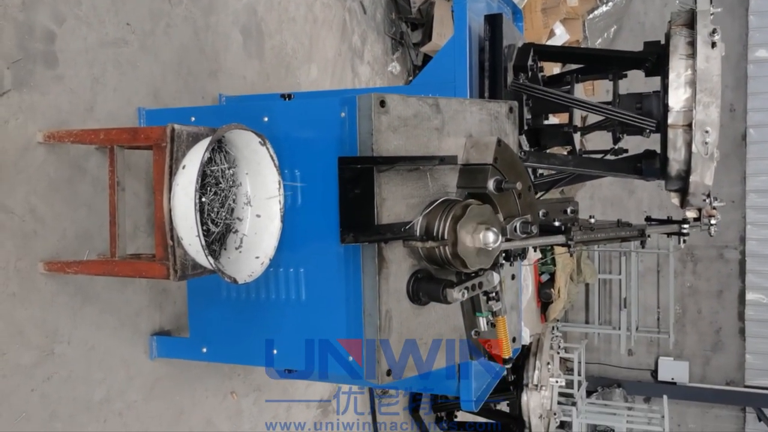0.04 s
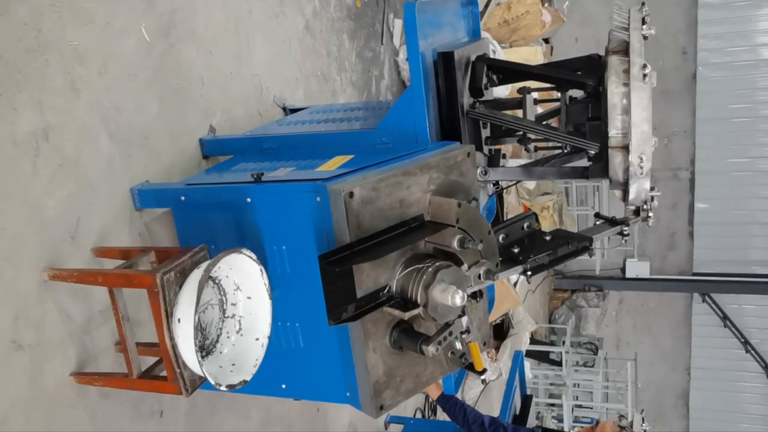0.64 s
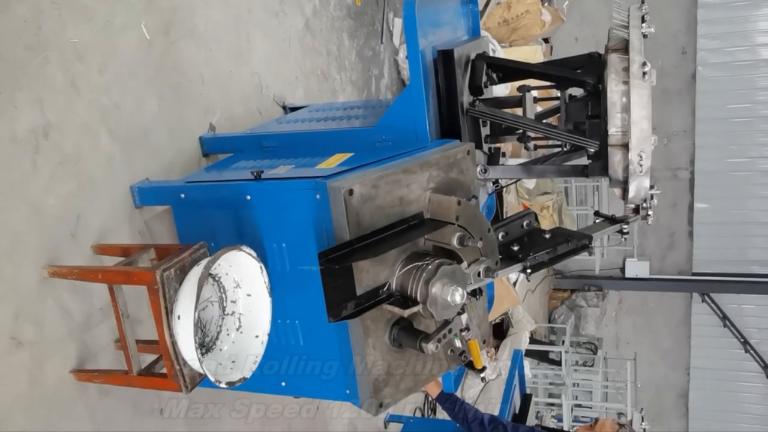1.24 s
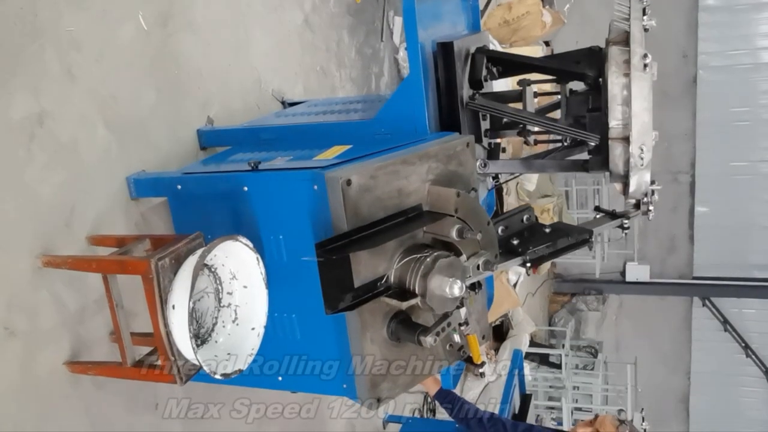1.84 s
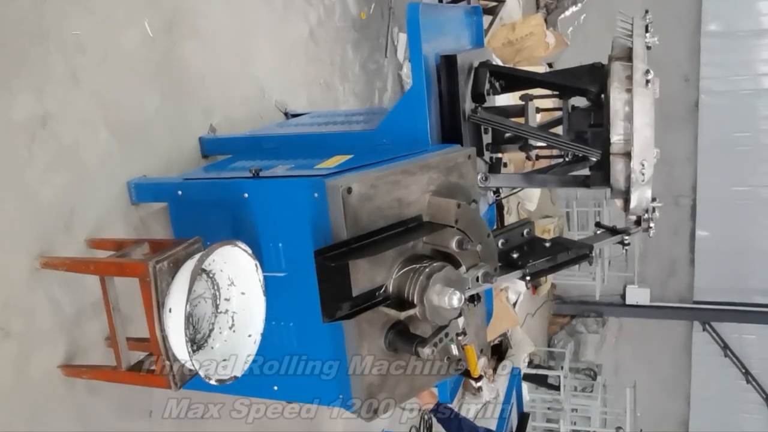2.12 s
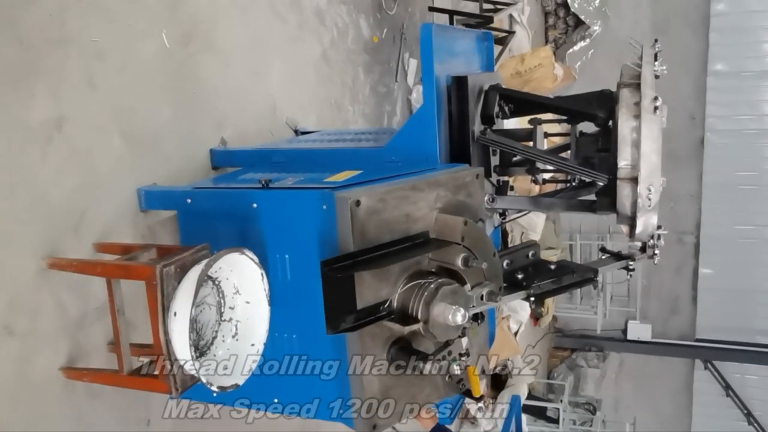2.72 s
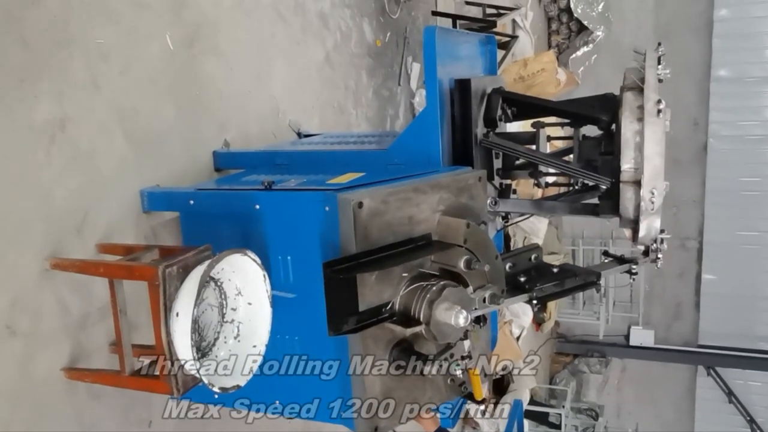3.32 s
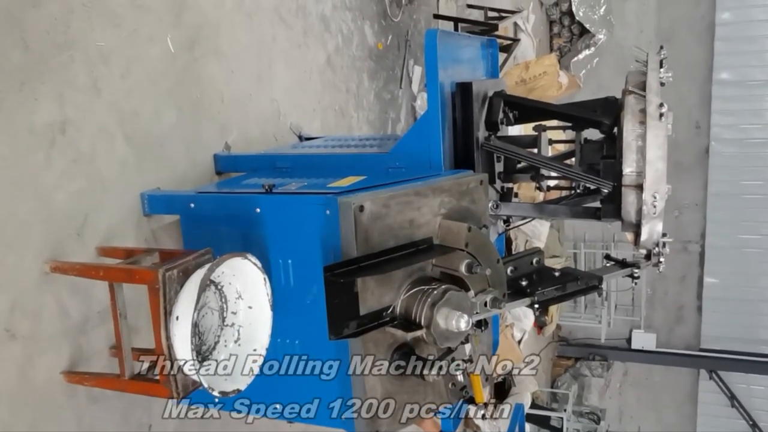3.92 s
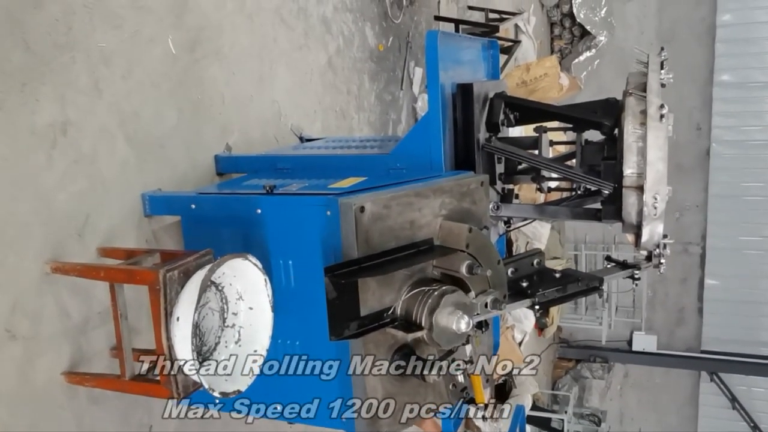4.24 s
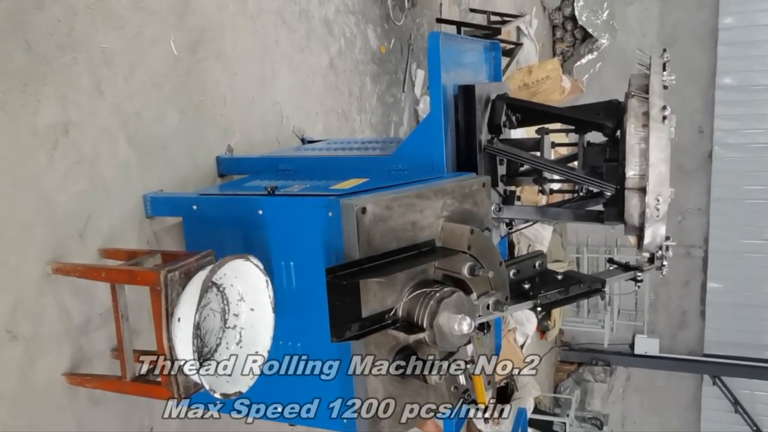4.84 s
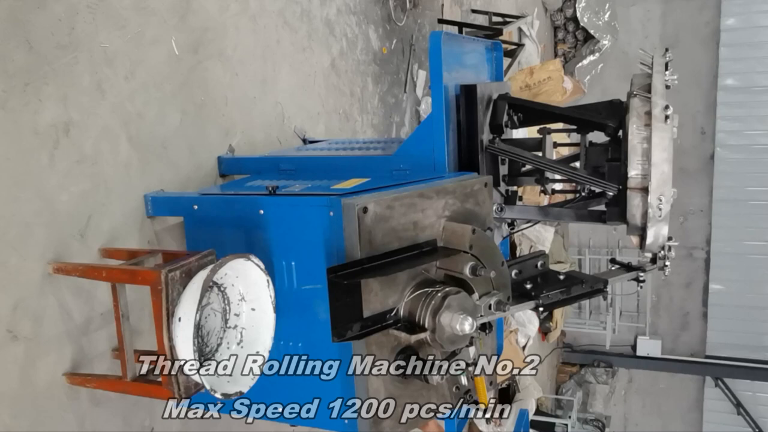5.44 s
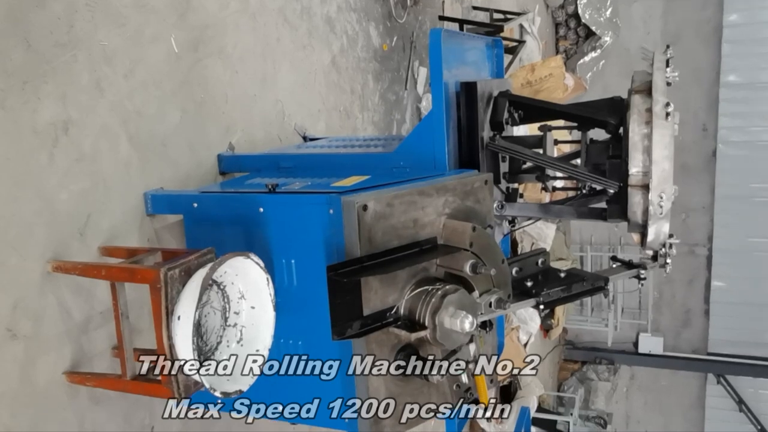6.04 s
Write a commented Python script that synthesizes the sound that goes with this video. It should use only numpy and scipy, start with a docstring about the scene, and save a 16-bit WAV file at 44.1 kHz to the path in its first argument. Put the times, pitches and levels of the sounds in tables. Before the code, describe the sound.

Close by in a workshop with little echo, a nail rolling machine runs briefly, drops out completely, then comes back labouring and gradually gathers speed. Nails clink, clank and skitter irregularly on a metal chute and into a bowl, bright and sharp above the gritty grind of the dies. Gears whine and steel panels drone throughout, and a feeder twice more swells into a dense metallic rattle.

```python
"""Finished nails clash down the chute of a thread rolling machine and ring in an enamel bowl.
Behind them more nails grind between the dies, and a vibrating feeder rattles a heap at mains rate.
Gear whine and the drone of the sheet-steel cabinet make the bed, in a dry-sounding workshop.
A short burst at speed cuts to silence; then the machine is back, labouring, and works up to speed."""
import sys
import numpy as np
from scipy import signal
from scipy.fft import rfft, irfft
from scipy.io import wavfile
from scipy.ndimage import uniform_filter1d

SR = 44100
rng = np.random.default_rng(int(sys.argv[2]) if len(sys.argv) > 2 else 0)


def transcribe(u):
    """Save the signal u as a 16-bit wav file named by the first command-line argument.

    u: samples, shape (n,) or (channels, n), limited to [-1, 1]; the rate is SR.
    q: integer samples, one column per channel.
    """
    v = np.clip(np.atleast_2d(u).T, -1, 1)
    q = np.round(v * 32767).astype(np.int16)
    wavfile.write(sys.argv[1], SR, q)


N = 272097
TIME = np.arange(N) / SR
MAINS_HZ = 49.6
SLOW_SHAFT_HZ = 47.33

# stretches in which the machine is heard: (start [s], end [s])
AUDIBLE_SPANS = [(-.1, .393), (.781, 6.3)]
# runs of the feeder: (start [s], end [s], rattle [dB], magnet hum [dB])
FEEDER_RUNS = [(0.161, .5, -24, -75), (2.215, 3.317, -19.5, -49), (5.723, 6.3, -21, -67.5)]
# bright ring of a struck nail: (frequency [Hz], level [dB])
NAIL_SPECTRUM = [(1500, -34), (3200, -21.5), (4300, -8), (5000, -5.5), (5700, -4.5), (6700, -7.5),
                 (8000, -4.5), (9400, -7.5), (10800, -2), (12400, -11.5), (16000, -22)]


def amp(db):
    """Decibels to amplitude."""
    return 10 ** (np.asarray(db) / 20)


def unit(x):
    """Scales to rms 1."""
    return x / np.sqrt(np.mean(x ** 2) + 1e-20)


def bump(offset, width):
    """A smooth bump of height 1 around zero."""
    return np.exp(-(2 * offset / width) ** 2)


def envelope(points):
    """Joins (time, value) points, sample by sample."""
    return np.interp(TIME, *np.transpose(points))


def value_at(points, hz):
    """Reads (frequency, value) points on a logarithmic frequency axis."""
    f, value = np.transpose(points)
    return np.interp(np.log(hz + 1), np.log(f), value)


def colour(x, spectrum):
    """Minimum-phase EQ of unit energy with the given spectrum."""
    size = 4096
    log_gain = np.log(amp(value_at(spectrum, abs(np.fft.fftfreq(size, 1 / SR)))))
    taps = np.fft.ifft(np.exp(np.conj(signal.hilbert(log_gain)))).real[:size // 2]
    return signal.oaconvolve(x, taps[None] / np.linalg.norm(taps), axes=1)[:, :N]


def resonate(x, modes):
    """Steep-sided resonances at rms 1; each mode's level sets its share of the power."""
    hz = np.fft.rfftfreq(N, 1 / SR)
    gain = sum(amp(db) / np.sqrt(width) / (1 + 1j * (hz - f) / width) ** 2 for f, width, db in modes)
    return unit(irfft(rfft(x) * gain, N))


def wander(rate_hz):
    """Smooth random motion of rms 1, rolling off above rate_hz."""
    steps = rng.standard_normal(4096)
    hz = np.fft.rfftfreq(len(steps), TIME[-1] / len(steps))
    slow = irfft(rfft(steps) * np.exp(-(hz / rate_hz) ** 2))
    return unit(np.interp(TIME, np.linspace(0, TIME[-1], len(slow)), slow))


def tone(hz, level_db, flutter_db, drift):
    """A sine wavering quickly in pitch and level; level_db is rms."""
    phase = 2 * np.pi * np.cumsum(hz * (1 + drift * wander(23.6))) / SR
    flutter = unit(amp(flutter_db * wander(36)))
    return np.sqrt(2) * amp(level_db) * flutter * np.sin(phase)


def clatter(per_s, spread_db, t60):
    """Tiny random impacts of uneven size, each setting dense steel modes ringing; rms 1."""
    impacts = amp(spread_db * np.minimum(rng.exponential(1, N), 4)) * (rng.random(N) < per_s / SR)
    energy = signal.lfilter([1], [1, -amp(-120 / (t60 * SR))], impacts ** 2)
    return unit(np.sqrt(energy) * rng.standard_normal((2, N)))


def mottle(x, depth_db):
    """Every nail lies differently and favours other modes: brief, narrow patches of ring."""
    bands = signal.stft(x, SR, nperseg=512)[2]
    patches = uniform_filter1d(rng.standard_normal(bands.shape[1:]), size=3, axis=0)
    patches = uniform_filter1d(patches, size=6, axis=1)
    gain = unit(amp(depth_db * unit(patches)))
    return signal.istft(bands * gain, SR, nperseg=512)[1][:, :N]


def lulls():
    """The grinding lets up briefly: dips in dB."""
    # centre and depth of each dip: (time [s], level [dB])
    dips = [(1.19, -4), (1.37, -4.5), (1.82, -3), (6.081, -7)]
    return sum(db * bump(TIME - s, 0.057) for s, db in dips)


def load():
    """Load on the dies, as the level of the grinding in dB."""
    # grinding envelope: (time [s], level [dB])
    grinding = [(0, -46), (.16, -43.5), (.21, -34), (.39, -31.5), (.8, -26), (1.0, -21.5), (2.3, -22.5),
                (2.7, -21.5), (3.15, -22), (3.65, -25.5), (5.65, -26.5), (5.9, -22), (6.17, -25.5)]
    return envelope(grinding) + lulls()


def feeding(start, end):
    """Envelope of a feeder run, 0 to 1: it builds up, holds and dies away."""
    rise_s, fall_s = 0.115, 0.33
    return np.clip(np.minimum((TIME - start) / rise_s, 1 - (TIME - end) / fall_s), 0, 1)


def shaft_speed():
    """Turns per second of the drive shaft: steady before the silence, running up from slow after it."""
    opening_hz, fast_hz = 71.6, 62.36
    run_up_at_s, run_up_s = 1.1, 1.68
    progress = 1 - np.exp(-(np.maximum(TIME - run_up_at_s, 0) / run_up_s) ** 1.3)
    rising_hz = SLOW_SHAFT_HZ + (fast_hz - SLOW_SHAFT_HZ) * progress
    return np.where(TIME < AUDIBLE_SPANS[1][0], opening_hz, rising_hz)


def strain(hz):
    """Swell of a tone in dB: a throb each turn of the die wheel, and flares of nearby resonances."""
    # a resonance flares up or chokes: (time [s], length [s], pitch [Hz], gain [dB])
    flares = [(0.088, 0.27, 214, 12), (0.06, 0.25, 432, 12), (1.3, 0.092, 194, 20), (1.228, 0.18, 288, 3.5),
              (1.653, 0.1, 304, 17.5), (2.258, 0.12, 202, 14.5), (2.68, 0.34, 392, 6),
              (4.046, 0.07, 364, 10.5), (4.23, 0.083, 366, 6.5), (4.477, 0.099, 366, 12),
              (4.75, 0.54, 196, 5), (4.936, 0.24, 370, 6.5), (5.337, 0.46, 198, 7.5),
              (5.702, 0.058, 209, 15.5), (5.923, 0.3, 374, 6), (6.001, 0.047, 196, 13.5),
              (6.128, 0.12, 181.4, -22.5)]
    gear_ratio, throb_peak_s, throb_db, flare_width_hz = 14, 4.48, 2, 36
    wheel_turns = np.cumsum(shaft_speed()) / SR / gear_ratio
    throb = np.cos(2 * np.pi * (wheel_turns - np.interp(throb_peak_s, TIME, wheel_turns)))
    t, pitch = TIME[::100], np.broadcast_to(hz, N)[::100]
    flare_db = sum(db * bump(t - s, length) * bump(pitch - f, flare_width_hz)
                   for s, length, f, db in flares)
    return throb_db * throb + np.interp(TIME, t, flare_db)


def workshop(x):
    """The room's short, diffuse tail, longest in the bass."""
    # reverb decay: (frequency [Hz], t60 [s])
    decay_times = [(200, 0.24), (2000, 0.042), (6000, 0.16), (16000, 0.031)]
    hz, t, bands = signal.stft(rng.standard_normal((2, SR // 2)), SR, nperseg=256)
    decay = amp(-60 * t / value_at(decay_times, hz)[:, None]) * (t > .008)
    tail = signal.istft(bands * decay, SR, nperseg=256)[1]
    return signal.fftconvolve(x, tail / np.linalg.norm(tail[0]), axes=1)[:, :N]


def magnet():
    """The feeder's magnet hums at mains rate and its octave, louder while it feeds."""
    idle_db, lag_s = -61, 0.19
    level = amp(idle_db) + sum(amp(db) * feeding(start + lag_s, end) for start, end, _, db in FEEDER_RUNS)
    phase = 2 * np.pi * MAINS_HZ * TIME
    return np.sqrt(2) * level * (np.sin(phase) + amp(-1.5) * np.sin(2 * phase))


def cabinet():
    """The frame rumbles and its sheet-steel panels drone; the big one beats against the gears."""
    # panel modes: (frequency [Hz], width [Hz], level [dB])
    panel_modes = [(284.8, 4.4, -2), (198, 48, 3), (519.5, 38, 3.5), (716, 54, 0), (939, 86, -1.5)]
    # frame rumble: (frequency [Hz], level [dB])
    rumble_spectrum = [(20, -34), (45, -19), (75, -10.5), (120, -22), (160, -2), (250, -2.5), (340, -0.5),
                       (450, 1.5), (560, -6.5), (1000, -5), (1500, -5.5), (3000, -58)]
    big_panel_hz, load_db = 201.8, load()
    # the drone grows under load and as the lowest gear tone nears its pitch
    apart_hz = abs(3 * shaft_speed() - big_panel_hz)
    drone_db = -7.5 - 0.5 * apart_hz + 0.77 * load_db + strain(big_panel_hz)
    drone = tone(big_panel_hz, drone_db, flutter_db=2.5, drift=0.00717)
    panels = amp(-34) * resonate(rng.standard_normal((2, N)), panel_modes)
    rumble = amp(-24.5 + 0.37 * load_db) * colour(rng.standard_normal((2, N)), rumble_spectrum)
    return drone + (panels + rumble) * amp(1.5 * wander(28))


def housing(hz):
    """Level in dB at which the gear housing radiates a tone of this pitch."""
    # housing resonances: (frequency [Hz], width [Hz], level [dB])
    housing_modes = [(151, 15, -34.5), (184, 6.1, -31), (219, 14, -43), (287, 27, -32), (370.6, 9.8, -35.5),
                     (408, 25.7, -33), (486, 110, -44.5)]
    cutoff_hz = 576
    power = sum(amp(db) ** 2 / (1 + (2 * (hz - f) / width) ** 2) for f, width, db in housing_modes)
    return 10 * np.log10(power / (1 + (hz / cutoff_hz) ** 20))


def gears():
    """Gear tones climb through the housing's resonances; at low speed they weaken, waver and judder."""
    # shaft harmonics, from the third upwards: (level [dB])
    harmonic_levels = [-1, -19, -15.5, -1.5, -2.5, 0.5, 4.5, -19.5]
    # modes of the juddering frame: (frequency [Hz], width [Hz], level [dB])
    judder_modes = [(148.5, 14, 1.5), (211, 16, -7.5), (254, 28, -2), (296, 9.5, -1), (411.7, 17, 3),
                    (490, 17, -3)]
    shaft_hz, smooth_hz = shaft_speed(), 57.27
    labour = np.clip((smooth_hz - shaft_hz) / (smooth_hz - SLOW_SHAFT_HZ), 0, 1)
    whine = np.zeros(N)
    for harmonic, db in enumerate(harmonic_levels, 3):
        hz = harmonic * shaft_hz
        level_db = db - 3 * labour + housing(hz) + strain(hz)
        whine += tone(hz, level_db, flutter_db=3, drift=0.00735 + 0.0163 * labour)
    judder = amp(-35) * np.sqrt(labour) * resonate(rng.standard_normal(N), judder_modes)
    return whine + judder


def bowl():
    """Sliding nails set the enamel bowl ringing, heard close up in the opening burst."""
    # modes of the bowl and its heap: (frequency [Hz], width [Hz], level [dB])
    bowl_modes = [(779, 61, -4), (1740, 190, -2.5), (4300, 130, -9.5), (5070, 110, 0.5), (6340, 310, -4.5),
                  (8950, 470, -10.5), (10430, 500, 0.5), (14150, 100, -12.5)]
    # envelope of the ring: (time [s], level [dB])
    ring_levels = [(0, -43.5), (.19, -37), (.215, -30.5), (.39, -28.5), (.7, -70)]
    sliding = clatter(per_s=410, spread_db=-3.5, t60=0.02)
    return amp(envelope(ring_levels)) * resonate(sliding, bowl_modes)


def feeder():
    """The heap of nails is tossed once each mains cycle and chatters as it lands on the track."""
    # nail chatter: (frequency [Hz], level [dB])
    chatter_spectrum = [(1500, -50), (3200, -7.5), (4300, 3), (4950, 2), (5500, -2.5), (7200, -5),
                        (8500, -0.5), (10800, 0), (12000, -6), (13500, -7), (15700, -9)]
    # modes of the track: (frequency [Hz], width [Hz], level [dB])
    track_modes = [(1070, 60, -5), (4425, 55, 3), (8918, 60, -2), (9200, 130, -3), (14270, 120, -13)]
    jostle_db = load() - 3.5  # between runs the nails only jostle
    boost_db = sum((db - jostle_db) * feeding(start, end) for start, end, db, _ in FEEDER_RUNS)
    level_db = jostle_db + boost_db + .5 * lulls()
    toss_db = .7 * np.sin(2 * np.pi * MAINS_HZ * TIME)
    chatter = clatter(per_s=3700, spread_db=5.5, t60=0.13) * amp(toss_db)
    # the track sings out more, the harder it is driven
    singing = amp(-8 + 1.1 * (level_db + 17)) * resonate(chatter, track_modes)
    # one high mode swells and fades during the middle run
    swell = amp(-27) * bump(TIME - 2.85, .55) * resonate(chatter, [(8950, 380, 0)])
    whistle = amp(-53 + 5 * wander(9)) * resonate(rng.standard_normal((2, N)), [(14170, 130, 0)])
    return amp(level_db) * (colour(chatter, chatter_spectrum) + singing) + swell + whistle


def dies():
    """Nails are squeezed and rolled between the dies: a coarse, uneven grind with a faint steel ring."""
    # grinding: (frequency [Hz], level [dB])
    grind_spectrum = [(300, -24.5), (600, -3.5), (1000, -13), (1400, -7), (1750, 3), (2600, 5), (3200, 2),
                      (4800, 3.5), (5500, -5.5), (8000, -3), (16000, -38)]
    # modes of the dies: (frequency [Hz], width [Hz], level [dB])
    die_modes = [(1062, 15, -2), (1387, 12, -4), (1760, 45, -1), (2952, 18, -3)]
    grit = clatter(per_s=1700, spread_db=-2, t60=0.033)
    level = amp(load() - 0.24 + 0.82 * wander(16))
    return level * (colour(grit, grind_spectrum) + amp(-20) * resonate(grit, die_modes))


def skids():
    """A nail skids over the heap in the bowl: a short, bright burst of tiny contacts."""
    # skids: (middle [s], length [s], level [dB])
    slides = [(.84, 0.052, -25.5), (3.628, 0.041, -23), (4.1, .04, -22.5), (4.375, .07, -27.5),
              (4.527, .05, -23.5), (4.76, .035, -26), (5.19, 0.055, -27.5), (5.506, 0.14, -30)]
    level = sum(amp(db) * bump(TIME - s, length) for s, length, db in slides)
    return level * colour(clatter(per_s=260, spread_db=2, t60=0.022), NAIL_SPECTRUM)


def falling_nails():
    """The hit list: loud accents, and a patter of lighter nails whose level follows the grinding."""
    # hits on chute and bowl: (time [s], ring [dB], clank [dB], knock [dB], pitch of the spot [Hz])
    loud_hits = [(0.0375, -30, -41, -38, 6400), (0.1180, -30.5, -50, -40, 6450),
                 (0.1975, -28.5, -42.5, -44, 6440), (0.8174, -22.5, -21.5, -47, 1780),
                 (0.9488, -17, -22.5, -47, 4630), (0.9744, -23, -39, -46, 4900),
                 (1.0749, -18.5, -23, -41, 5650), (1.1548, -17.5, -38, -49, 5400),
                 (1.1634, -18, -42, -51, 5000), (1.3275, -22, -19, -50, 1930),
                 (1.3564, -21, -37, -52, 5850), (1.5007, -18.5, -22, -35, 4940),
                 (1.5786, -19.5, -20.5, -37, 4900), (1.587, -19.5, -29, -46, 1770),
                 (1.7548, -18, -21, -28, 4760), (1.7631, -21, -28, -38, 4530),
                 (1.8079, -21, -25, -39, 5000), (1.9688, -18, -24, -25, 4240),
                 (2.0712, -19.5, -25, -26, 1830), (2.0863, -19.5, -27, -33, 4950),
                 (2.1492, -16, -28, -41, 4670), (2.3483, -21, -21, -31, 1760),
                 (2.6571, -19, -32, -31.5, 4220), (2.6856, -18.5, -22, -30, 5000),
                 (2.8649, -17, -20, -32, 2640), (2.9507, -16.5, -26, -27, 4800),
                 (3.0687, -19, -22.5, -24.5, 2660), (3.1412, -18.5, -30, -41, 9680),
                 (3.2691, -24, -18, -31, 1660), (3.3671, -20, -36, -35, 7810),
                 (3.5366, -16, -32, -44, 5000), (3.5688, -15.5, -36, -47, 4570),
                 (3.6379, -18, -23, -54, 2120), (3.7951, -19.5, -27, -34, 4650),
                 (3.8602, -22, -26, -29, 2460), (3.9184, -20.5, -37.5, -48, 5600),
                 (3.9362, -20.5, -30, -43.5, 4200), (3.9991, -19.5, -28, -32.5, 1890),
                 (4.0949, -21.5, -19.5, -38, 1610), (4.1156, -19, -20, -28.5, 2040),
                 (4.2008, -15.5, -25, -49, 4820), (4.2317, -18, -28, -48, 4200),
                 (4.2545, -15.5, -27, -47, 4740), (4.2961, -21, -34, -46, 4760),
                 (4.5121, -22, -25, -44, 1800), (4.6019, -24, -30, -44, 4330),
                 (4.6501, -16.5, -45, -36, 5130), (4.8188, -19, -29, -43, 5000),
                 (4.9616, -25, -32, -43, 4600), (4.9823, -16.5, -23, -38, 4760),
                 (5.2108, -21.5, -29, -29.5, 4700), (5.2844, -22, -29, -33, 4660),
                 (5.5441, -24, -23, -24.5, 2440), (5.5731, -19.5, -25, -32, 2820),
                 (5.7331, -14, -19.5, -24, 4520), (5.7567, -19, -39, -41, 4380),
                 (6.0526, -19.5, -25, -48, 2050)]
    light_per_s, spread_db, top_hz = 30, 10, 4980
    jitter, softness, spot = rng.random((int(TIME[-1] * light_per_s), 3)).T
    times = (np.arange(len(jitter)) + jitter) / light_per_s
    level_db = np.interp(times, TIME, load()) - spread_db * softness
    pitch_hz = top_hz * 2 ** (-1.5 * spot ** 3)
    light_hits = zip(times, level_db - 3, level_db - 7.5, level_db - 14, pitch_hz)
    return [*loud_hits, *light_hits]


def strikes():
    """A nail hits and skitters; the spot rings at its pitch, and the chute clanks and knocks under it."""
    # midrange clank of the chute: (frequency [Hz], level [dB])
    clank_spectrum = [(600, -20.5), (1300, -8.5), (1750, 10), (2100, 5), (2600, 6.5), (3300, -8.5),
                      (6000, -19.5)]
    # low knock of the chute: (frequency [Hz], level [dB])
    knock_spectrum = [(300, -21), (700, -3), (980, 3.5), (1300, -0.5), (2000, -19.5), (5000, -34.5)]
    attack_s, skitter_t60, after_ring_t60, chute_t60 = 0.0007, 0.036, 0.13, 0.05
    t = np.arange(SR // 10) / SR
    attack = np.minimum(t / attack_s, 1)
    after_ring = amp(-24 - 60 * t / after_ring_t60)
    layers = np.zeros((4, 2, N + len(t)))
    rings, clanks, knocks, notes = layers
    for s, ring_db, clank_db, knock_db, pitch_hz in falling_nails():
        at = slice(round(s * SR), round(s * SR) + len(t))
        weight_db = ring_db + 23.5
        hold_s = .0042 * amp(.5 * weight_db)  # light nails only tick, heavy ones skitter for longer
        release_s = np.maximum(t - hold_s, 0)
        nail_shape = attack * (amp(-60 * release_s / skitter_t60) + after_ring)
        chute_shape = attack * amp(-60 * release_s / chute_t60)
        ring = amp(ring_db + 0.6) * nail_shape
        clank = amp(clank_db + 0.74) * chute_shape
        # a share of the power feeds one note: the nail's or bowl's if high, the chute's if low
        if pitch_hz > 3000:
            nail_share, chute_share = min(.42 + .03 * max(-weight_db, 0), .85), 0  # softer rings purer
        else:
            nail_share, chute_share = 0, .45
        scrape, clash, thud, grain = rng.standard_normal((4, 2, len(t)))
        band = signal.butter(2, [pitch_hz / 1.06, pitch_hz * 1.06], "bandpass", fs=SR)
        note = unit(signal.lfilter(*band, grain)[:, ::-1])  # reversed, so it starts at full strength
        rings[:, at] += np.sqrt(1 - nail_share) * ring * scrape
        clanks[:, at] += np.sqrt(1 - chute_share) * clank * clash
        knocks[:, at] += amp(knock_db + 1.6) * chute_shape * thud
        notes[:, at] += (np.sqrt(nail_share) * ring + np.sqrt(chute_share) * clank) * note
    rings, clanks, knocks, notes = layers[:, :, :N]
    chute = colour(clanks, clank_spectrum) + colour(knocks, knock_spectrum)
    return colour(rings, NAIL_SPECTRUM) + chute + notes


def scene():
    """The stereo mix: narrow in the bass, wide in the treble, with gears and hum in the centre."""
    # likeness of left and right: (frequency [Hz], correlation [0-1])
    likeness = [(30, 0.88), (190, 0.9), (350, 0.91), (550, 0.14), (900, 0.39), (2000, 0), (16000, 0.03)]
    hits = strikes() + skids()
    rattle = mottle(dies() + feeder() + bowl(), depth_db=1)
    left, unrelated = rfft(rattle + cabinet() + hits + amp(-10) * workshop(hits))
    correlation = value_at(likeness, np.fft.rfftfreq(N, 1 / SR))
    right = correlation * left + np.sqrt(1 - correlation ** 2) * unrelated
    return irfft(np.array([left, right]), N) + gears() + magnet()


def record(dry):
    """Colours each side, rounds off the peaks, cuts in the silence and trims the top end."""
    # stereo balance: (frequency [Hz], left minus right [dB])
    balance = [(100, -2.5), (200, 0), (380, -4.5), (700, 1), (1100, 1), (1750, -6), (3200, 0), (4800, -1),
               (5500, 3.5), (7400, -3.5), (9000, 2.5), (9900, -11), (11000, -14), (14000, -3.5),
               (16000, -15.5)]
    ceiling, cutoff_hz = .85, 15900
    tilt_db = value_at(balance, np.fft.rfftfreq(N, 1 / SR))
    sides = amp(np.array([tilt_db, -tilt_db]) / 2)
    coloured = irfft(rfft(dry) * sides / np.sqrt((sides ** 2).mean(0)), N)
    rounded = coloured / (1 + (coloured / ceiling) ** 6) ** (1 / 6)
    gate = sum((TIME > start) & (TIME < end) for start, end in AUDIBLE_SPANS).astype(float)
    low_pass = signal.firwin(511, cutoff_hz, window=("kaiser", 9), fs=SR)
    return signal.oaconvolve(rounded * uniform_filter1d(gate, size=60), low_pass[None], "same")


dry = scene()
out = record(dry)
transcribe(out)
```